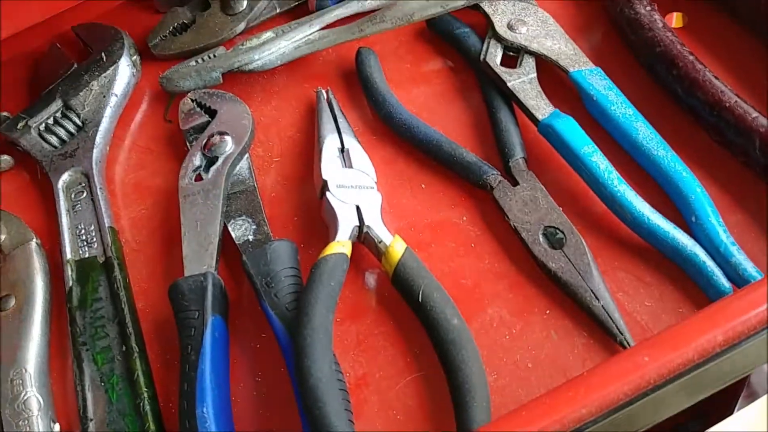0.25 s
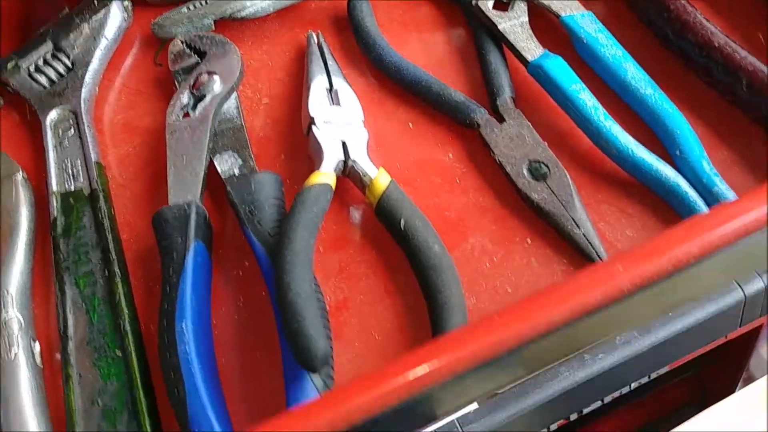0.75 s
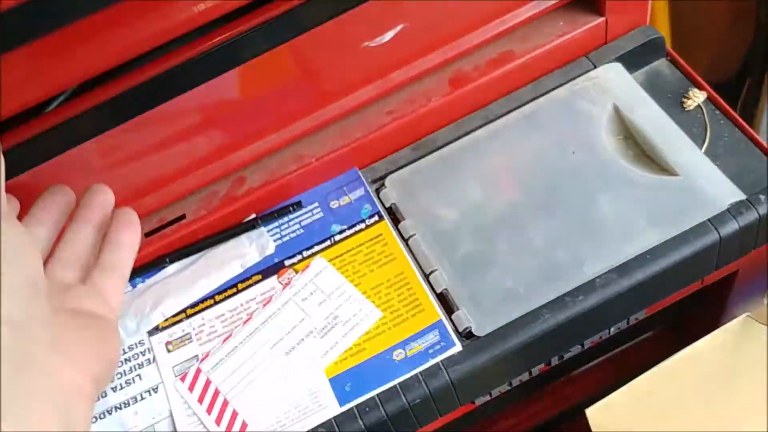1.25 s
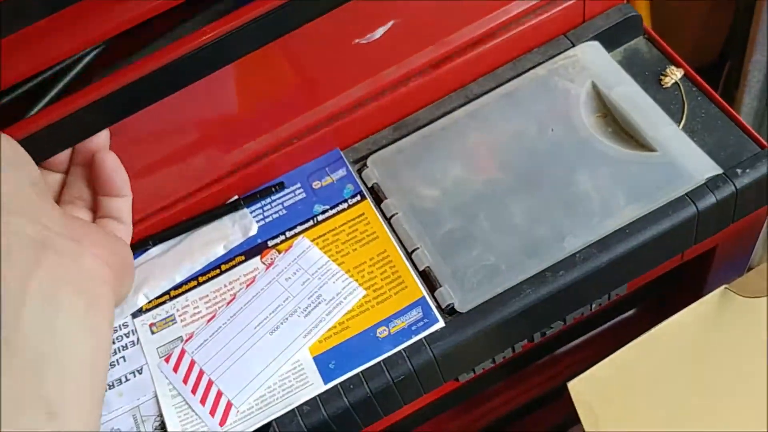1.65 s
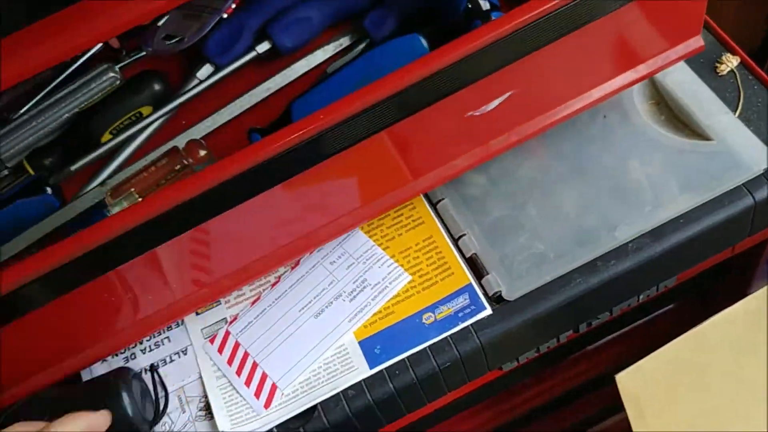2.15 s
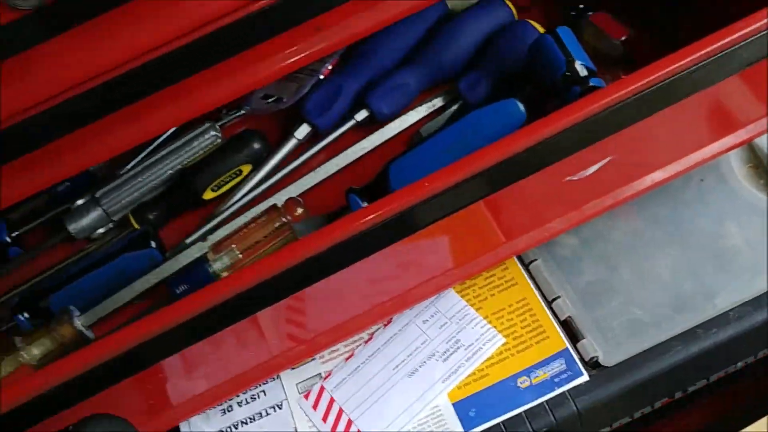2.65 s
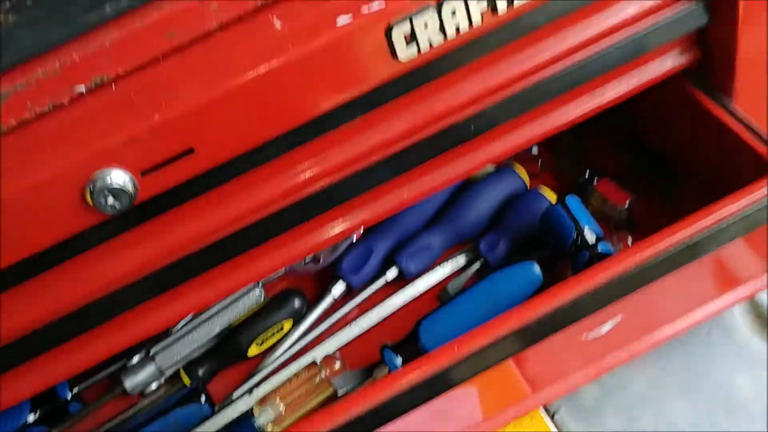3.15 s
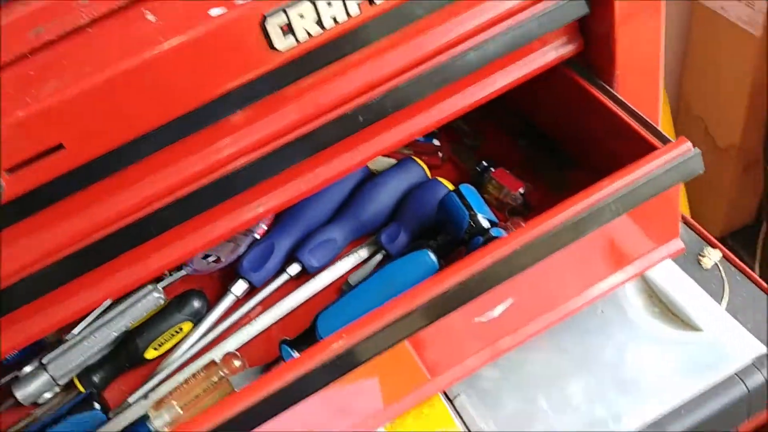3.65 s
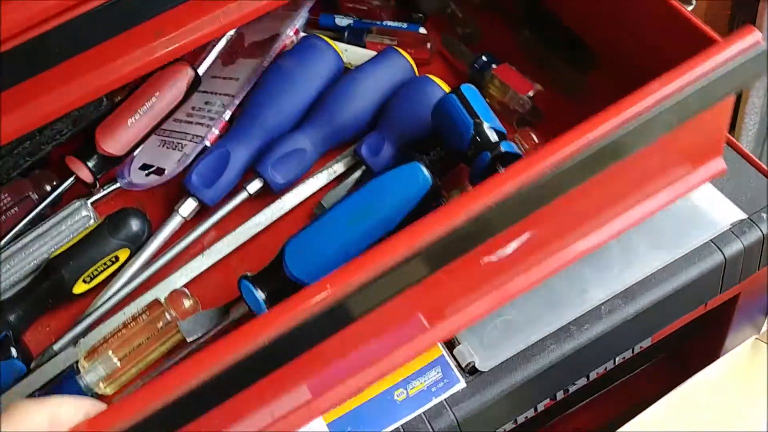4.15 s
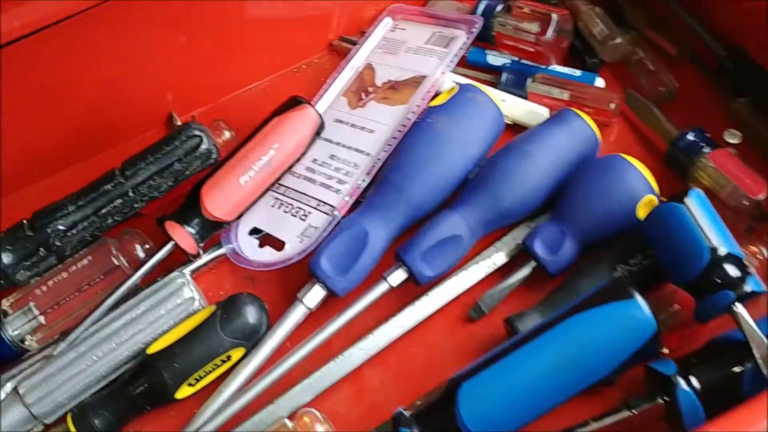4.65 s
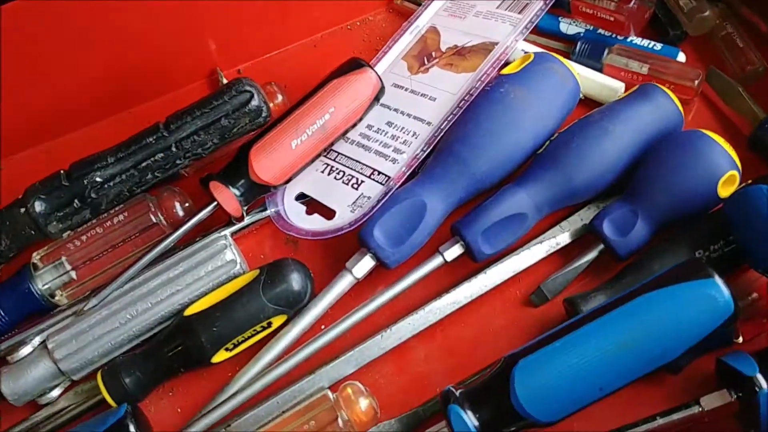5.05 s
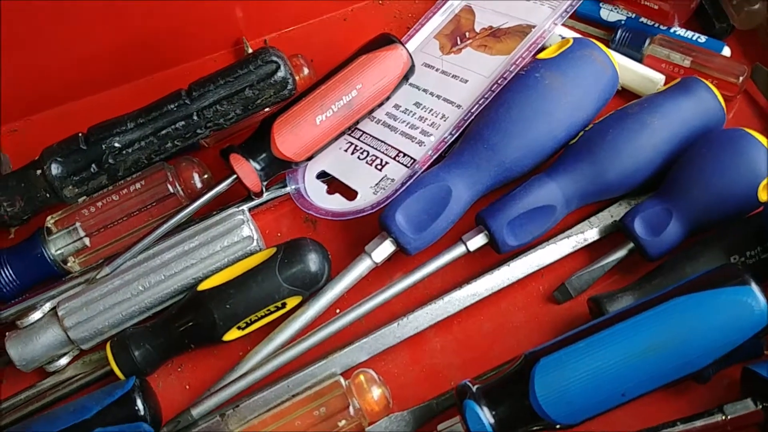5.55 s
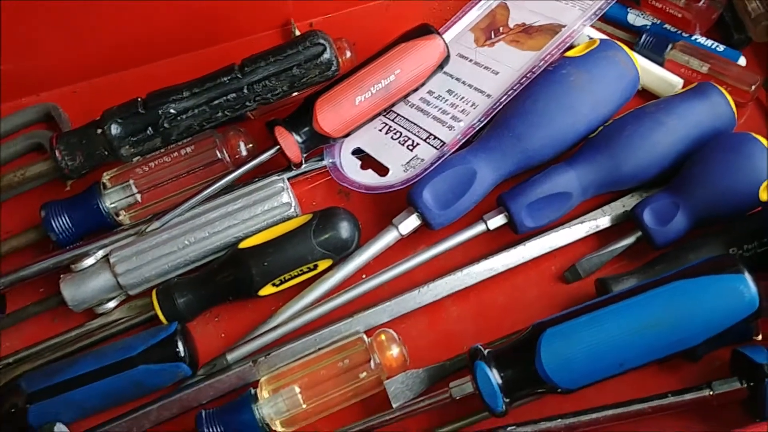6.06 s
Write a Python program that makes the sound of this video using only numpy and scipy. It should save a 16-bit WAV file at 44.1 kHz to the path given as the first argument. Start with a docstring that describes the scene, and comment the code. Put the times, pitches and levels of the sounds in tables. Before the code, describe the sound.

Metal drawers full of hand tools are shoved and pulled with sharp bangs and hollow cabinet booms, settling into faint hum and a last low air buffet.

```python
"""Steel tool-chest drawers are slid and knocked in a garage, close to two microphone ports.
From the start a low hum and hiss (shaped noise) lie under small knocks, and steel shafts ring (fading sines).
Then runners scrape (noise through a steel response), and blows set loose tools chattering and the cabinet
booming; a drawer slams near 1.4 s, a hand rubs the steel, more heavy blows follow and it grows quiet.
At the very end a puff of air (short low swirls) buffets the left port."""
import sys
import numpy as np
from scipy import signal
from scipy.fft import rfft, irfft
from scipy.io import wavfile
from scipy.ndimage import uniform_filter1d, minimum_filter1d

SR = 44100
rng = np.random.default_rng(int(sys.argv[2]) if len(sys.argv) > 2 else 0)


def log_audio(samples):
    """Write samples as a 16-bit WAV file to the path given in sys.argv[1]."""
    # one column per channel
    frames = np.atleast_2d(samples).T
    # limit to full scale, then quantise
    limited = np.clip(frames, -1, 1)
    pcm = np.round(limited * 32767).astype(np.int16)
    wavfile.write(sys.argv[1], SR, pcm)


N = 277830
T = np.arange(N) / SR
RIGHT_LAG_S = 0.0003335
TILT_DB = np.array([[1.8], [-1.8]])  # left a little louder, right a little softer
# rows of every contact force
CLANG, BOOM, TRAY, TREBLE, UPPER_CLANG = range(5)


def amp(db):
    """Turn decibels into a plain multiplier."""
    return 10 ** (np.asarray(db) / 20)


def unit(x):
    """Scale a sound to an average (rms) level of 1."""
    return x / np.sqrt(np.mean(x ** 2))


def on_hz(table, count):
    """Read a (Hz, value) table at the bins of a transform of count samples."""
    hz, value = np.transpose(table)
    bins_hz = np.fft.rfftfreq(count, 1 / SR)
    return np.interp(np.log(bins_hz + 1), np.log(hz), value)


def band(x, lo_hz, hi_hz):
    """Keep only the pitches between two frequencies."""
    return signal.sosfilt(signal.butter(3, [lo_hz, hi_hz], "bandpass", fs=SR, output="sos"), x)


def fade(t, t60):
    """Die away by 60 dB in t60 seconds (5 ms at the shortest)."""
    return np.exp(-np.log(1000) * t / max(t60, .005))


def ring(modes, t):
    """A struck body: a sum of fading sines, scaled to energy 1."""
    y = sum(amp(db) * np.sin(2 * np.pi * hz * t) * fade(t, t60) for hz, db, t60 in modes)
    return y / np.sqrt(np.sum(y ** 2))


def grit(scatter_db):
    """Dense contacts of very uneven size: noise with a random gain on every sample."""
    return unit(rng.standard_normal(N) * amp(scatter_db * rng.exponential(size=N)))


def waver(rate):
    """Slow random wandering, spread 1: noise averaged twice over 1 / rate seconds."""
    k = int(SR / rate)
    noise = rng.standard_normal(N)
    return unit(uniform_filter1d(uniform_filter1d(noise, k), k))


def ports(make):
    """Two ports hear one common sound plus a part of their own; the right one hears it later."""
    # (frequency [Hz], left minus right [dB])
    port_balance = [(60, 0), (110, 7), (200, -0.5), (380, 6), (700, 5), (1290, 0), (2380, -6.5),
                    (4400, 1.5), (8120, 9.5), (15000, 4)]
    # (frequency [Hz], likeness of the two ports [0 to 1])
    port_likeness = [(60, .95), (300, .93), (700, 0.7), (1500, 0), (15000, 0.16)]
    common, left, right = make(), make(), make()
    n = len(common)
    alike = np.clip(on_hz(port_likeness, n), 0, 1)
    half_balance = amp(on_hz(port_balance, n) / 2)
    lag = np.exp(-2j * np.pi * np.fft.rfftfreq(n, 1 / SR) * RIGHT_LAG_S)
    left_mix, right_mix = [np.sqrt(alike) * rfft(common) + np.sqrt(1 - alike) * rfft(own)
                           for own in (left, right)]
    return irfft(np.array([left_mix * half_balance, right_mix / half_balance * lag]), n)


def garage():
    """Steady low hum and microphone hiss: noise coloured by one curve."""
    # colour of the background: (frequency [Hz], relative level [dB per Hz])
    hum_and_hiss = [(18, -49.5), (30, -21.5), (64, 4.5), (131, 0.5), (190, -12), (831, -18), (1050, -27.5),
                    (6000, -41.5), (7000, -47), (7900, -38), (10200, -56), (13000, -50), (16400, -52)]
    level_db = -47.5

    def coloured_noise():
        return irfft(rfft(rng.standard_normal(N)) * amp(on_hz(hum_and_hiss, N)), N)

    return amp(level_db) * unit(ports(coloured_noise))


def puff():
    """Turbulence at the left port, hardly at the right: swirls of a few low cycles with a fluttering edge."""
    # the puff before a fixed boost: (time [s], level [dB], swirl pitch [octaves above swirl_hz])
    gust = [(6.085, -40.5, 0.051), (6.11, -21, 0.29), (6.125, -28.5, 0.23), (6.149, -9.5, 0.33),
            (6.172, -18, 1.15), (6.19, -9.5, 0.27), (6.222, -21.5, -.1), (6.24, -15.5, 0.3),
            (6.265, -17, 1.21), (6.3, -7, 0.25)]
    swirl_hz, pitch_scatter_octaves = 96, 0.29
    gap_s, swirl_s = .012, 0.02614
    flutter_db, boost_db = -15.5, 4
    air = np.zeros(N + SR)
    times, level_db, octaves = np.transpose(gust)
    t = np.arange(int(swirl_s * SR)) / SR
    starts = np.arange(times[0] - swirl_s / 2, times[-1], gap_s)
    for s, (late, pitch) in zip(starts, rng.standard_normal((40, 2))):
        noise = rng.standard_normal(SR // 10)
        flutter = unit(band(band(noise, 150, 440), 190, 1700))[-len(t):]
        pitch_octaves = np.interp(s + swirl_s / 2, times, octaves) + pitch_scatter_octaves * pitch
        swirl = np.sin(2 * np.pi * swirl_hz * 2 ** pitch_octaves * t) + amp(flutter_db) * flutter
        # each swirl starts a little early or late, swells and dies
        first = int((s + late * gap_s / 4) * SR)
        air[first:][:len(t)] += np.sin(np.pi * t / swirl_s) * swirl
    air = air[:N] * amp(np.interp(T, times, level_db) + boost_db)
    return np.array([2 * air, amp(-29.5) * air])


def shafts():
    """Steel shafts and the slammed drawer front ring on: sines that build over some cycles, then fade."""
    # (start [s], frequency [Hz], level [dB], time to fall 60 dB [s])
    ringing_modes = [(0, 2616, -54.5, 0.85), (0, 2757, -58, 1.4), (1.37, 147, -3, 0.84),
                     (1.37, 158.5, -8, 0.83), (2.109, 4270, -53, 0.1), (2.115, 2930, -56, 0.09),
                     (3.519, 838, -16, 0.25), (3.519, 1320, -2, 0.094), (3.52, 2610, -28, 0.1),
                     (3.519, 1560, -37.5, 0.6), (3.561, 2785, -42.5, 0.59), (3.668, 2766, -44, 0.18),
                     (3.706, 2720, -49, 0.17), (2.87, 1210, -67, 1.5), (4.661, 1350, -35, 0.32),
                     (4.92, 3560, -51, 0.37), (4.92, 3660, -58, 1.1), (5.021, 1610, -51.5, 0.13)]
    build_cycles = 6.6
    out = np.zeros(N)
    loose = amp(1.4 * waver(30))
    for s, hz, db, t60 in ringing_modes:
        t = np.maximum(T - s, 0)
        build = 1 - np.exp(-t * hz / build_cycles)
        tone = amp(db) * np.sin(2 * np.pi * hz * t) * fade(t, t60) * build
        # the higher modes waver in level
        out += tone * (loose if hz > 1000 else 1)
    return out * amp(TILT_DB)


def sheet():
    """Response of thin steel: modes too dense to tell apart, the treble dying first, then the garage."""
    # colour of the steel: (frequency [Hz], relative level [dB per Hz])
    steel_colour = [(290, -29), (500, 7.5), (669, -10), (786, -6.5), (1020, -5.5), (1270, -0.5),
                    (1700, -11), (2060, -5.5), (2530, -1), (5320, -18.5), (8000, -16), (10300, -40),
                    (13900, -28.5), (15400, -29), (16400, -47)]
    # how long the steel rings: (frequency [Hz], time to fall 60 dB [s])
    steel_decay = [(600, 0.1), (1500, 0.07), (4000, 0.039), (10000, 0.025)]
    garage_db, garage_t60_s = -39.5, 0.1
    t = np.arange(SR // 5) / SR
    decay_hz, decay_s = np.transpose(steel_decay)
    out = 0
    for hz in 500 * 2 ** np.arange(0, 5, .5):  # half-octave bands
        t60 = np.interp(np.log(hz), np.log(decay_hz), decay_s)
        decay = fade(t, t60) + amp(garage_db) * fade(t, garage_t60_s)
        part = band(rng.standard_normal(len(t)), hz, hz * np.sqrt(2)) * decay
        out = out + part / np.sqrt(np.sum(part ** 2) / hz)
    # colour with the shortest response that starts at once (minimum phase)
    cepstrum = irfft(np.log(amp(on_hz(steel_colour, len(t)))), len(t))
    cepstrum[1:len(t) // 2] *= 2
    cepstrum[len(t) // 2 + 1:] = 0
    return irfft(rfft(out) * np.exp(rfft(cepstrum)), len(t))


def slides():
    """Power of the drawers sliding: scrape, rumble and treble curves, wavering as runners stick and slip."""
    # one list per drawer movement: (time [s], scrape [dB], rumble [dB], treble [dB])
    drawer_moves = [
        [(0.0, -68, -30.5, -82), (0.198, -69, -52.5, -85), (0.408, -69.5, -57.5, -82), (0.546, -67, -57.5, -74),
         (0.65, -66, -46, -75)],
        [(0.8, -60, -47, -72), (0.91, -44, -41, -53.5), (1.046, -47.5, -37.5, -61), (1.22, -39, -33.5, -54.5),
         (1.318, -26.5, -29.5, -44), (1.408, -31, -24, -59), (1.496, -42.5, -13, -60.5),
         (1.66, -56, -34.5, -67)],
        [(1.66, -47.5, -34.5, -58), (1.722, -49, -35, -43), (1.85, -31.5, -40, -54), (1.962, -70, -29, -78),
         (2.206, -55, -44, -58.5), (2.376, -68, -41.5, -60), (2.49, -62, -42.5, -64.5),
         (2.75, -67.5, -47.5, -65)],
        [(3.15, -50.5, -52, -73), (3.23, -59, -35, -66), (3.342, -39.5, -43.5, -41), (3.422, -34, -32, -48),
         (3.482, -37.5, -34.5, -48), (3.562, -31.5, -32, -59), (3.666, -50.5, -35.5, -66),
         (3.75, -67, -48, -80)],
        [(3.88, -58.5, -47, -64), (3.962, -66, -38.5, -71.5), (4.078, -43, -40, -71),
         (4.126, -40.5, -28.5, -53.5), (4.252, -45, -24.5, -59), (4.38, -34.5, -36.5, -56),
         (4.51, -43.5, -32, -53.5), (4.7, -44.5, -32, -58)],
        [(4.7, -33, -31.5, -51.5), (4.8, -36.5, -29, -55), (4.874, -44, -22, -63), (4.956, -46, -30.5, -62),
         (5.008, -57, -34, -69), (5.158, -95.5, -64, -85), (5.3, -67, -51, -79)],
        [(5.3, -71, -47, -82), (5.398, -79, -59, -85), (5.532, -72.5, -51.5, -85), (5.656, -97, -75, -94),
         (5.888, -78, -54, -75.5), (6.01, -66.5, -41, -75.5), (6.1, -65.5, -51, -76.5)],
    ]
    upper_db, boom_db, tray_db = -2, -2, -3
    slip_db, slip_rate = 2.5, 66  # spread of the wavering; its speed per second
    power = np.zeros((5, N))
    for move in drawer_moves:
        s, *levels = np.transpose(move)
        # silent outside the movement
        scrape, rumble, treble = (np.interp(T, s, c, left=-200, right=-200) for c in levels)
        rows_db = np.array([scrape, rumble + boom_db, rumble + tray_db, treble, scrape + upper_db])
        power += amp(2 * rows_db)
    return power * amp(2 * slip_db * waver(slip_rate))


def rubs():
    """Power of a hand rubbing along the steel: each rub swells and dies once."""
    # (start [s], length [s], scrape [dB], treble [dB])
    hand_rubs = [(0.32, 0.065, -58.5, -64), (2.316, 0.06, -78, -49.5), (2.387, 0.1, -53.5, -51),
                 (2.496, 0.053, -47, -44.5), (2.738, .1, -73.5, -59), (2.78, 0.14, -77, -58),
                 (3.096, 0.33, -52, -44), (3.262, 0.14, -64, -33)]
    power = np.zeros((5, N))
    for s, length, db, treble_db in hand_rubs:
        swell = np.sin(np.pi * np.clip((T - s) / length, 0, 1)) ** 2
        power[[UPPER_CLANG, TREBLE]] += amp([[2 * db], [2 * treble_db]]) * swell
    return power


def clink(centre_hz, t):
    """Each blow rings the tool modes near its centre, unevenly and differently at each port."""
    # loose tools and drawer walls: (frequency [Hz], level [dB], time to fall 60 dB [s])
    tool_modes = [(785, 0, .06), (850, 0, .06), (910, 0, .06), (1080, -1, .05), (1170, -1, .05),
                  (1288, 0, .06), (1440, 0, .05), (1610, -2, .05), (1850, -1, .05), (2090, 0, .05),
                  (2340, 0, .05), (2466, 0, .05), (2605, 0, .05), (2880, 0, .05), (3100, -1, .04),
                  (3290, -1, .04), (3463, -1, .04), (3950, -3, .04), (4560, -3, .04)]
    reach_octaves, scatter_db = .7, 3.5  # 6 dB weaker this far from the centre
    luck = rng.standard_normal((2, len(tool_modes), 2))
    heard = []
    for port in luck:
        modes = []
        for (hz, db, t60), (detune, unevenness) in zip(tool_modes, port):
            far = np.log2(hz / centre_hz) / reach_octaves
            modes.append((hz * (1 + .015 * detune), db + scatter_db * unevenness - 6 * far ** 2, t60))
        heard.append(ring(modes, t))
    return np.array(heard)


def blows():
    """Each blow is a crack, then a fading chatter: force powers, kicks to the cabinet, and own tones."""
    # levels before the offsets below: (time [s], clang [dB], boom re clang [dB],
    # drawer tone re clang [dB], treble re clang [dB], drawer tone [Hz], clink centre [Hz],
    # clink re clang [dB], time for the chatter to fall 60 dB [s])
    blow_list = [(0.003, -41, -1, 11, -32, 374, 829, 1, 0.17),
                 (0.055, -31.5, -11, 4.5, -60, 441, 875, 1, 0.087),
                 (0.095, -49, -4, 11, -31, 443, 899, 5, 0.14),
                 (0.409, -36, -14, -10, -8.5, 400, 947, -1, 0.086),
                 (0.434, -24.5, -21, -4, -30, 453, 1060, -1.5, 0.1),
                 (0.475, -32.5, -4, -1.5, -55, 470, 1050, -2, 0.15),
                 (0.585, -40.5, -16, -7.5, -47, 540, 930, -2, 0.28),
                 (0.854, -38, 5, -16, -20, 506, 2150, -5, 0.28),
                 (0.926, -29.5, 1.5, -3, -16, 302, 2330, -7, 0.19),
                 (1.067, -28, -10, -14, -24, 509, 2900, -3.5, 0.33),
                 (1.13, -19.5, -15, -19.5, -18, 445, 2890, -2.5, 0.2),
                 (1.15, -14, -13.5, -13.5, -18.5, 420, 2380, -6, 0.1),
                 (1.235, -19.5, -10.5, -2.5, -16.5, 424, 2350, -7, 0.17),
                 (1.255, -9.5, -9, -8, -20.5, 439, 2090, -6, 0.18),
                 (1.298, -7, -27, -9, -10.5, 537, 964, -5, 0.12),
                 (1.36, -1, -15.5, -8.5, -7.5, 278, 2186, -4, 0.14),
                 (1.384, 0, -15, -5.5, -13, 323, 1230, -5, 0.17),
                 (1.407, -1, -8, -8.5, -24, 350, 910, -5, 0.16),
                 (1.436, -7, -8, -14, -53, 384, 1140, -3, 0.39),
                 (1.684, -16, -12, -10, -38, 352, 1540, -0.5, 0.26),
                 (1.701, -17, -21, -9.5, -12.5, 272, 1570, -10, 0.15),
                 (1.762, -21.5, 1.5, -4.5, -3.5, 408, 1300, -7, 0.3),
                 (1.826, -14.5, -21, -5, -37, 472, 940, 0.5, 0.15),
                 (1.879, -9, -34, -3.5, -20, 432, 884, -5, 0.12),
                 (1.9, -7.5, -20, -6, -9.5, 489, 2830, -2.5, 0.12),
                 (1.965, -24.5, -6, -3, -12.5, 402, 859, -4, 0.2),
                 (2.16, -15, -10.5, 1.5, -9.5, 373, 1023, -3, 0.17),
                 (2.168, -10, -12, 4.5, -15.5, 397, 1200, -7, 0.14),
                 (2.209, -29.5, 4, 12, -30, 397, 902, -1, 0.27),
                 (2.223, -23, 6.5, 8.5, -17, 410, 802, -8, 0.15),
                 (2.551, -4, -29.5, -6, 1, 494, 2390, -5, 0.11),
                 (2.568, -10, -20, -6, -6, 468, 2175, 2, 0.13),
                 (3.17, -37, -10.5, 8, -0.5, 257, 1000, -15, 0.16),
                 (3.219, -24, -30, -31, -15, 380, 2110, -2, 0.14),
                 (3.233, -25.5, -25, -25, -4, 510, 2120, -7, 0.14),
                 (3.242, -27.5, -8, -7, -0.5, 297, 2230, -8, 0.14),
                 (3.394, -18.5, -11, -5, -8, 253, 977, -14, 0.33),
                 (3.488, -21, -26.5, -19, -22, 246, 1450, 2.5, 0.14),
                 (3.495, -13.5, -22, -27.5, -11.5, 510, 1870, 0.5, 0.19),
                 (3.518, -1.5, -10.5, -30, -5.5, 530, 1320, 2, 0.097),
                 (3.533, -3, -20, -11.5, -22, 249, 867, -8.5, 0.15),
                 (3.672, -38.5, -7.5, 2.5, -22, 459, 2670, -9, 0.12),
                 (3.702, -47.5, -5, 12, -33.5, 390, 2700, -13, 0.16),
                 (3.911, -26.5, 5, 1.5, -25.5, 449, 1380, -4.5, 0.22),
                 (3.985, -35.5, -4.5, 5.5, -15, 427, 2530, 0, 0.29),
                 (4.032, -31.5, -13, 5, -29.5, 462, 864, -0.5, 0.18),
                 (4.061, -14.5, -16.5, -9.5, -31, 383, 1520, -0.5, 0.14),
                 (4.181, -2, -15, -6.5, -4, 343, 2470, -4, 0.15),
                 (4.211, -3.5, -17, -6, -23.5, 431, 2200, -1.5, 0.14),
                 (4.245, -6, -18.5, -12.5, -28, 478, 816, -0.5, 0.17),
                 (4.351, -7.5, -27.5, -4.5, -13, 426, 1420, -3.5, 0.13),
                 (4.407, -14, -22.5, 4.5, -10, 405, 1230, 0, 0.1),
                 (4.481, -29, -3, -13, -19.5, 375, 1390, 2.5, 0.16),
                 (4.521, -12, -15.5, -10.5, -26, 355, 970, -1.5, 0.18),
                 (4.717, -0.5, -21.5, -17, -5.5, 320, 2810, 0, 0.15),
                 (4.733, -10, -39, -8, -7, 410, 2120, -5, 0.16),
                 (4.75, -2.5, -10, -8.5, -12.5, 408, 2125, -8, 0.23),
                 (4.768, -6.5, -17, -5, -10.5, 360, 1970, -6, 0.22),
                 (4.79, -3.5, -6.5, -18, -14, 527, 829, -3.5, 0.13),
                 (4.807, -9, -8, 2.5, -15, 356, 2560, -3, 0.13),
                 (4.826, -12, 1.5, -1.5, -10, 427, 1050, -2, 0.16),
                 (4.889, -27, 9, -9, -10, 265, 805, -3, 0.098),
                 (4.914, -12.5, -28, -1.5, -13.5, 268, 2760, -1.5, 0.079),
                 (5.026, -49.5, 14, 14, -3.5, 390, 894, -6, 0.098),
                 (5.169, -49.5, 13, 16.5, -1.5, 433, 875, -6, 0.16),
                 (5.916, -49.5, -1, 6, -13.5, 320, 1092, -3.5, 0.13)]
    crest_db, attack_s = 6.5, .0007
    crack_db, crack_t60_s = 1.5, 0.013
    clang_offset_db, boom_noise_db, kick_db, jolt_db = -8, 3, 10, 3
    upper_db, upper_per_treble = 0, 0.32  # brighter blows have more upper clang
    tone_decay, pan_scatter_db = 0.75, 5
    power, kicks, tones = np.zeros((5, N)), np.zeros(N), np.zeros((2, N))
    t = np.arange(SR // 4) / SR
    for s, db, boom_db, tray_db, treble_db, tray_hz, clink_hz, clink_db, t60 in blow_list:
        i = int(s * SR)
        n = min(len(t), N - i)
        chatter = fade(t, t60) + amp(crack_db) * fade(t, crack_t60_s)
        shape = amp(db - crest_db) * chatter * (1 - np.exp(-t / attack_s))
        rows_db = [clang_offset_db, boom_db + boom_noise_db, tray_db, treble_db,
                   upper_db + upper_per_treble * treble_db]
        power[:, i:i + n] += (shape[:n] * amp(rows_db)[:, None]) ** 2
        kicks[i] += amp(db + boom_db + kick_db)
        # the tools get one sharp jolt, then a rattle
        jolt = shape * fade(t, t60) * rng.standard_normal(len(t))
        jolt[0] += amp(db + jolt_db)
        tool_ring = clink(clink_hz, t[:SR // 8])
        tools = amp(clink_db) * signal.fftconvolve(jolt[None], tool_ring, axes=1)[:, :len(t)]
        tray = amp(db + tray_db) * np.sin(2 * np.pi * tray_hz * t) * fade(t, tone_decay * t60)
        pan_db = pan_scatter_db * rng.standard_normal()
        both = tray * amp(TILT_DB) + tools * amp([[pan_db / 2], [-pan_db / 2]])
        tones[:, i:i + n] += both[:, :n]
    return power, kicks, tones


def chest():
    """Contacts ring the cabinet, the tray floor and several spots of the sheet steel."""
    # both: (frequency [Hz], level [dB], time to fall 60 dB [s])
    cabinet_modes = [(72, -18.5, .25), (91.5, -1.5, 0.57), (127.1, -5, 0.54), (153.9, 8.5, 0.1),
                     (188, 0, 0.15)]
    tray_modes = [(275, -9, 0.05), (309, -3.5, 0.13), (375.8, -0.5, 0.089), (422.2, -4.5, 0.15),
                  (470, -2, 0.066), (553.5, -17.5, 0.033), (626, -16, 0.017)]
    spots = 4
    blow_power, kicks, tones = blows()
    force = np.sqrt(slides() + rubs() + blow_power)
    t = np.arange(SR // 2) / SR
    boom_contacts = force[BOOM] * rng.standard_normal(N) + kicks
    low = signal.fftconvolve(boom_contacts, ring(cabinet_modes, t))[:N]
    low += amp(-1.5) * signal.fftconvolve(force[TRAY] * grit(2.1), ring(tray_modes, t))[:N]
    low = band(low, 78, 1200) * amp(TILT_DB)
    # the low part is only half as late at the right port
    out = tones + [low[0], np.roll(low[1], int(RIGHT_LAG_S * SR / 2))]
    for _ in range(spots):
        steel, contacts = ports(sheet), grit(3.48)
        for row, lo_hz, hi_hz in ((CLANG, 500, 1800), (UPPER_CLANG, 1800, 4000), (TREBLE, 4000, 17000)):
            part = band(steel, lo_hz, hi_hz)
            part = part / np.sqrt(spots * np.sum(part.mean(axis=0) ** 2))
            out += signal.oaconvolve((force[row] * contacts)[None], part, axes=1)[:, :N]
    return out


def scene():
    """Add the background, the puff, the ringing shafts and the tool chest."""
    return garage() + puff() + shafts() + chest()


def record(dry):
    """Microphones drop the deep bass, a look-ahead limiter tames peaks over full scale, the top is cut."""
    # treble ring of the left port's cavity: (frequency [Hz], width [Hz], boost [dB])
    port_cavity = (8440, 720, 3.5)
    limiter_window_s, top_hz = 0.0039, 16400
    x = signal.sosfilt(signal.butter(4, 48, "highpass", fs=SR, output="sos"), dry)
    hz, width, db = port_cavity
    x[0] += (amp(db) - 1) * signal.lfilter(*signal.iirpeak(hz, hz / width, fs=SR), x[0])
    # lowest gain needed nearby, then smoothed
    reach = int(limiter_window_s * SR)
    need = minimum_filter1d(1 / np.maximum(np.abs(x), 1), reach, axis=1)
    x = x * uniform_filter1d(need, reach // 2, axis=1)
    top_cut = signal.ellip(10, .2, 70, top_hz, fs=SR, output="sos")
    return np.clip(signal.sosfilt(top_cut, x), -1, 1)


dry = scene()
out = record(dry)
log_audio(out)
```